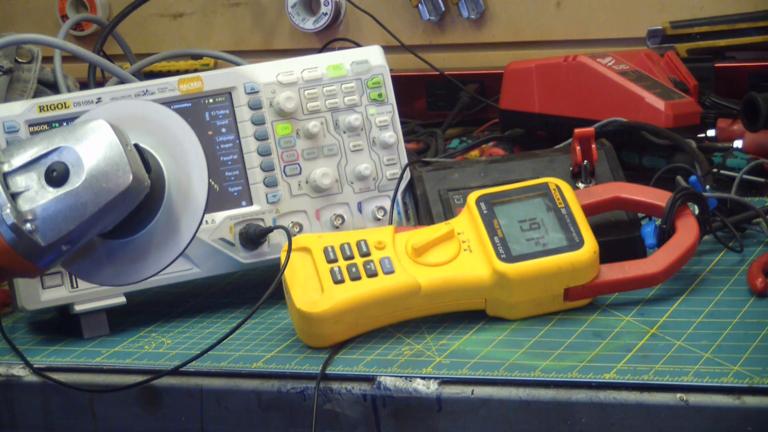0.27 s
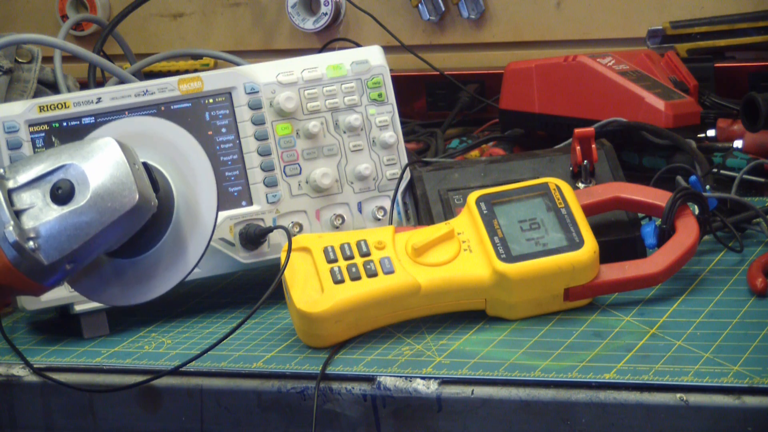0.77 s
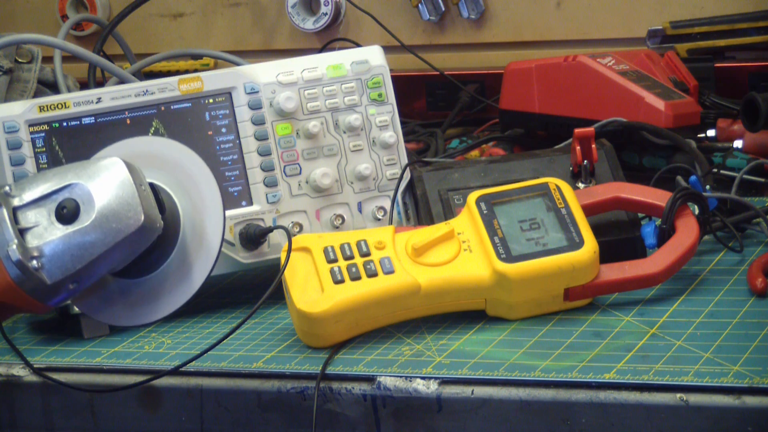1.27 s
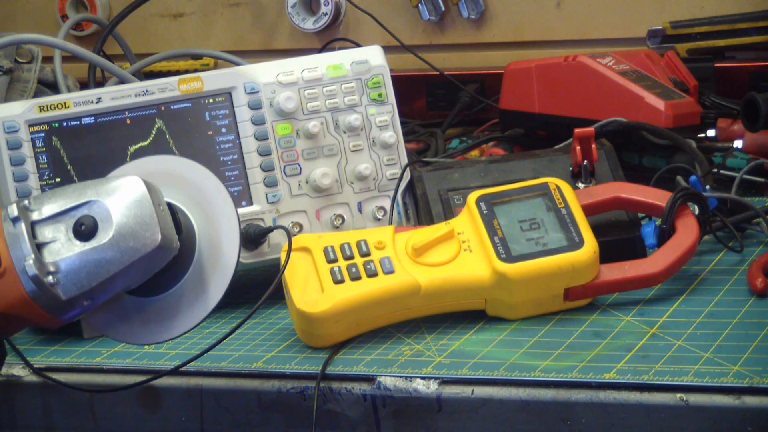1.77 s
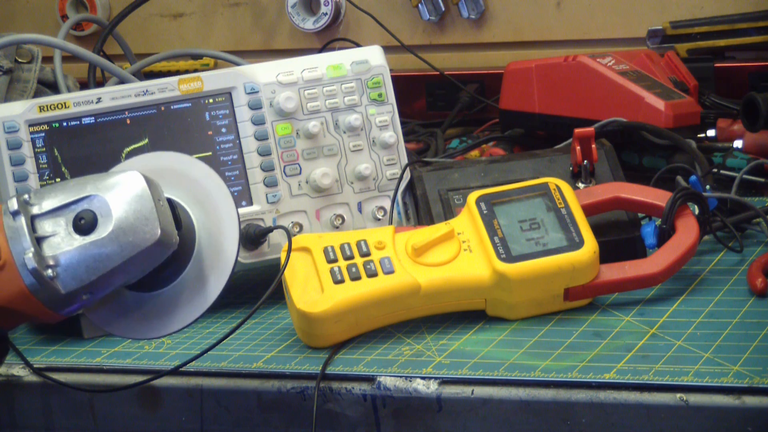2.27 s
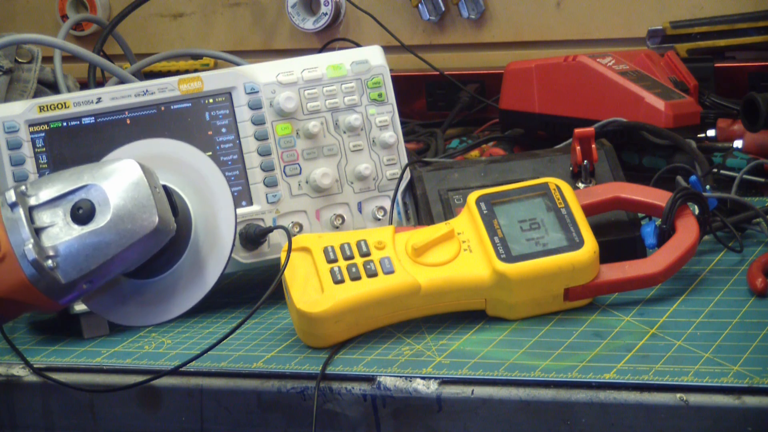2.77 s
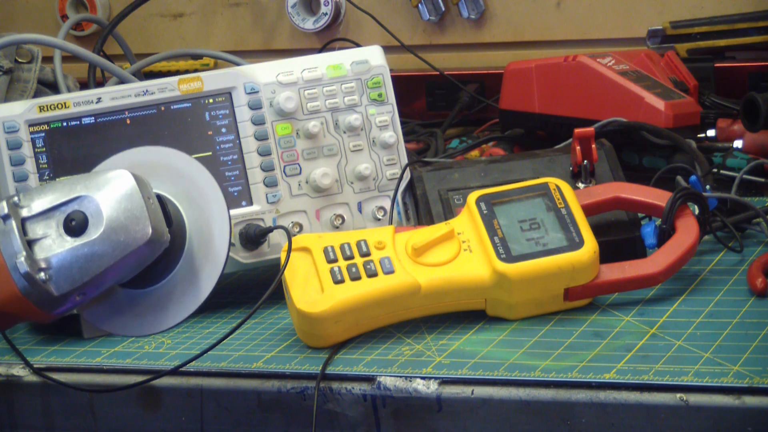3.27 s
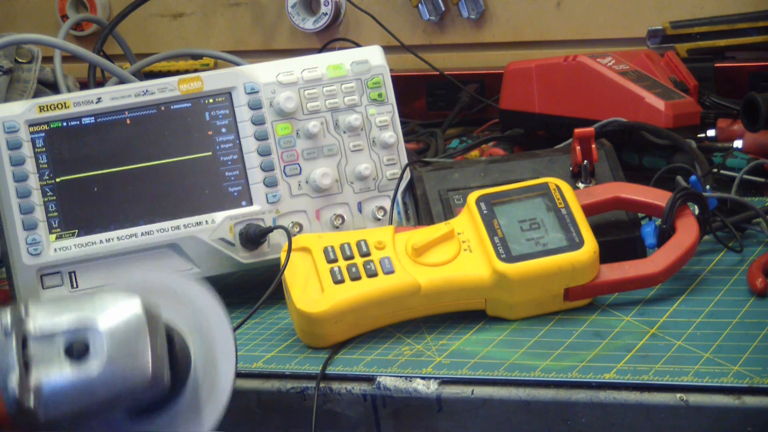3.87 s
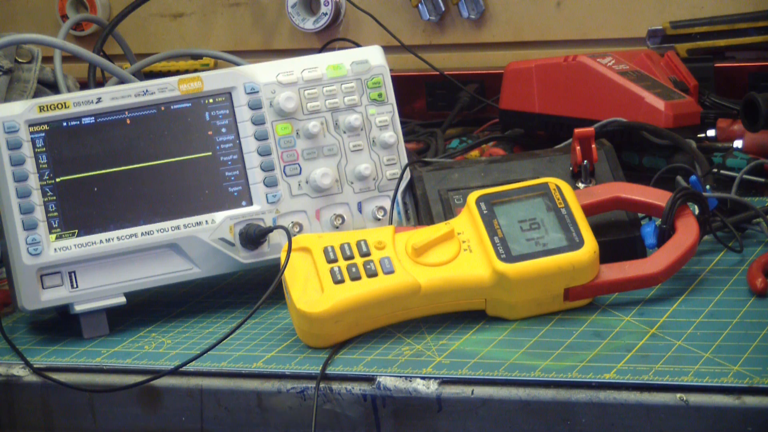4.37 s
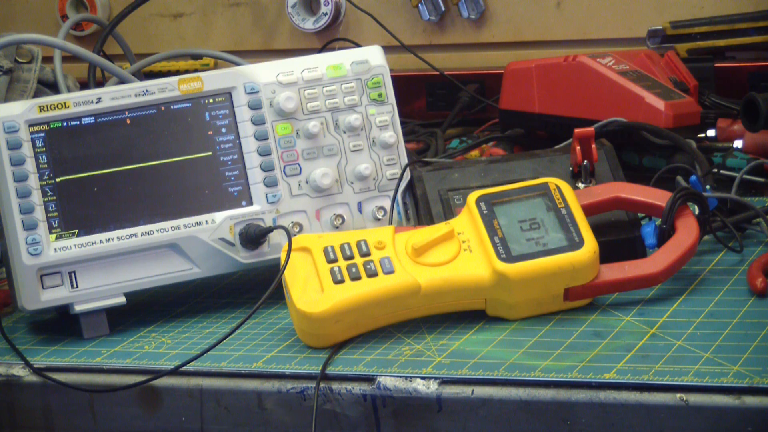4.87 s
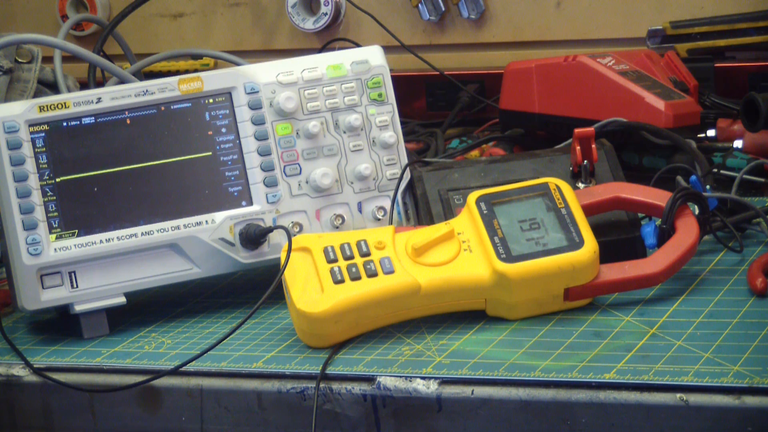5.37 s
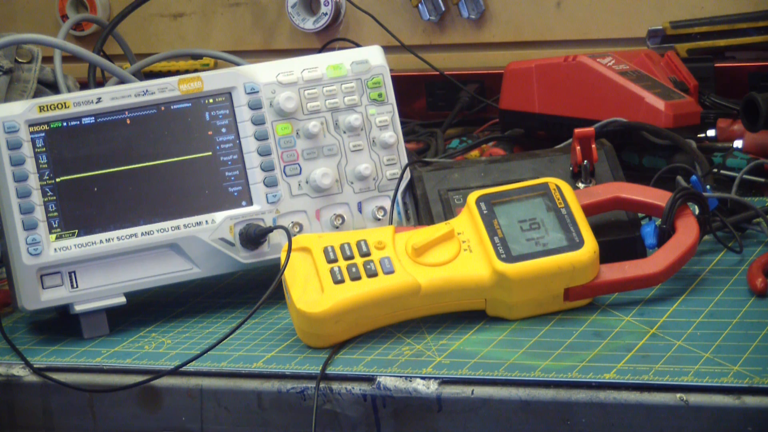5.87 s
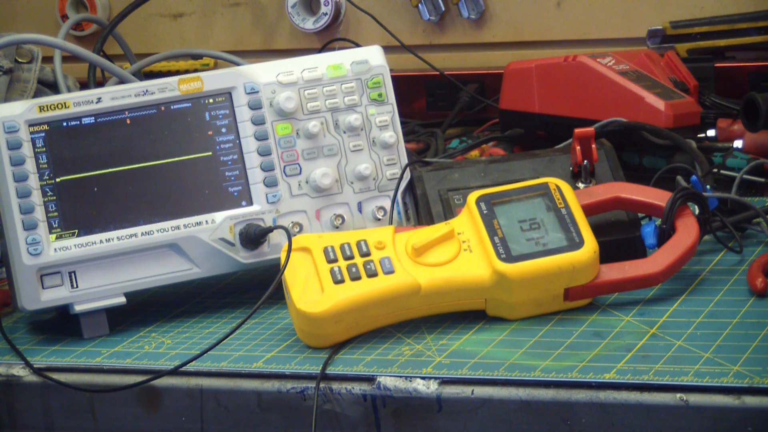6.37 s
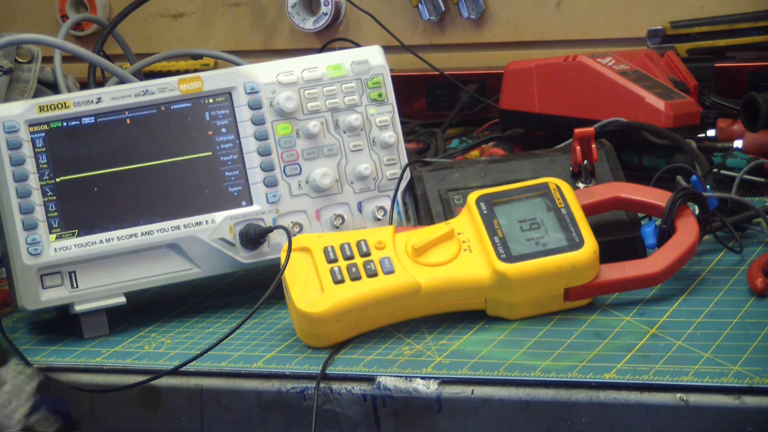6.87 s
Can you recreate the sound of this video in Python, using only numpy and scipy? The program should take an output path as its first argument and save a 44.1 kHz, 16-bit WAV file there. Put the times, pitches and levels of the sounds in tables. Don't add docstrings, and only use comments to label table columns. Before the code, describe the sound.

From 0 to 2.2 seconds an angle grinder runs free, close by: a piercing gear whine near 5.9 kHz, creeping up very slightly, with broad airy fan hiss and fine metallic rattle. At 2.2 it is switched off and the whine begins a smooth continuous slide downward, wavering as it passes through metal case resonances. By 4 seconds it is a rough mid-high growl near 3 kHz; from 4.1 to 5.4 irregular hard gear slaps and clatter grow while the pitch keeps sinking toward about 1 kHz. At 5.26 the disc touches the bench: a loud gritty scrape, bright ringing around 2 kHz and uneven skips. From 5.8 the treble dulls and a low thrum swells until it stalls around 6.1. A faint soft set-down follows to 6.45. Then only quiet low shop rumble and wavering fan hum, gradually lifted since 2.7, remain until 7.1. Short, hard workshop reflections.

```python
import sys
import numpy as np
from scipy import signal
from scipy.io import wavfile
from scipy.ndimage import uniform_filter1d

SR = 44100
rng = np.random.default_rng(int(sys.argv[2]) if len(sys.argv) > 2 else 0)


def field_ratio(decibels):
    return 10 ** (np.asarray(decibels, dtype=float) / 20)


def master(y):
    cut = np.clip(np.atleast_2d(y).T, -1, 1)
    pcm = np.round(cut * 32767)
    wavfile.write(sys.argv[1], SR, pcm.astype(np.int16))


N = 313506
T = np.arange(N) / SR

# spindle order, level in dB settling, at full speed, coasting.
MESH_LINES = [(34, -24, -20, -20), (35, -18, -15, -16), (36, -19, -20, -16), (37, -18, -11, -8),
              (38, -10, -10, -9), (39, -4, -4, -3), (40, -5, -1, -4), (41, 0, 0, 0), (42, -6, -16, -5),
              (43, -15, -10, -3), (44, -24, -16, -7), (45, -32, -28, -10), (46, -32, -32, -16)]
# multiple of the mesh, level in dB, width in steps of 90 Hz.
MESH_OVERTONES = [(2, 0, 5.0), (3, -5, 6.0)]
# time in seconds, level in dB.
WHINE_LEVEL = [(0, -18.5), (.25, -21.5), (.5, -19.5), (.75, -22), (1, -25.5), (1.3, -22), (1.6, -20),
               (1.9, -20.5), (2.2, -20), (2.35, -24), (3.05, -24.5), (3.4, -20.5), (3.9, -23.5), (4.2, -20),
               (4.6, -21), (4.95, -19), (5.25, -27)]
# centre in Hz, width in Hz, level in dB.
GEAR_HEAD_MODES = [(5610, 50, 3), (5815, 50, -3), (5925, 90, 3)]
# centre in Hz, width in Hz, level in dB under the whine.
CASE_VENTS = [(2880, 320, -1), (3500, 300, -8), (4350, 350, -7), (5780, 350, -4), (7900, 800, -9),
              (9000, 800, -6), (11000, 550, -12)]
# centre in Hz, width in Hz, level in dB.
CASE_MODES = [(962, 25, 0.5), (1111.4, 39, 1), (1342, 59, -1.5), (1878, 52, 1.5), (2042, 27, 6.5),
              (2430, 136, 0), (2715, 73, 0.5), (3180, 34, -2), (3450, 17, -10), (3990, 140, -5),
              (4310, 25, 0.5), (5030, 180, -1),
              (5440, 35, -1), (5774, 81, 4.5), (6220, 47, 5.5), (7690, 210, 1.5), (8210, 260, 0.5),
                   (8740, 170, 2.5), (9080, 220, 0.5), (10970, 270, -0.5), (12200, 430, -9)]
# time in seconds, peak in dB, kick to the whine in relative dB.
HARD_SLAPS = [(4.1412, -21, 9), (4.246, -19.5, 2), (4.276, -18, 2), (4.38, -15.5, 4), (4.416, -20, 8),
              (4.451, -19, 10), (4.4897, -17.5, 7), (4.57, -20, 8.5), (4.59, -16.5, -1), (4.621, -19.5, 10),
              (4.665, -17, 9), (4.707, -18.5, 9), (4.749, -20.5, 7), (4.7936, -19.5, 9),
              (4.8199, -19.5, 14), (4.8377, -18, 9), (4.864, -16, 12), (4.904, -16.5, 5.5),
              (4.933, -19, 14), (4.9594, -20, 5), (5.003, -20, 1), (5.0314, -19, 8), (5.0746, -18.5, 0),
              (5.11, -20, 14), (5.136, -18, 13), (5.1603, -19, 3), (5.217, -18, 0), (5.2794, -22, -1),
              (5.338, -15, -3), (5.4386, -16, 1)]
# frequency in Hz, level in dB, t60 in seconds.
CASE_RINGS = [(462, -23, 0.17), (690, -10.5, 0.15), (1900, 2, 0.07), (2058, 2, 0.069), (2900, -4.5, 0.079),
              (3244, -3.5, 0.041), (3560, -0.5, 0.047), (4314, -2, 0.053), (4960, -4, .03),
              (7680, -8, .02), (8160, -15, 0.025)]
# multiple of motor turns, level in dB rms.
MOTOR_LINES = [(1, -50), (2, -47), (3, -51), (4, -47), (5, -49), (6, -51), (7, -52)]
# spindle order, level in dB rms.
DISC_UNBALANCE = [(1, -69), (3, -61), (7, -54), (8, -48)]
# frequency in Hz, level in dB per Hz.
AIR_FAST_SPECTRUM = [(35, -66), (60, -69), (358, -41), (543, -19.5), (596, -28), (685, -10.5), (1060, -0.5),
                     (1250, -9.5), (2390, 0), (4690, -4), (5780, -1.5), (6800, 1), (8980, -8.5),
                     (12700, -26.5), (15300, -40.5)]
# frequency in Hz,
# level in dB per Hz.
AIR_SLOW_SPECTRUM = [(35, -70), (123, -66), (392, -37.5), (824, -5), (1400, -10.5), (2000, -0.5),
                     (2600, -10), (4370, -4.5), (5780, -7.5), (6800, -14), (8370, -21.5), (9620, -31.5),
                     (13000, -44.5), (15300, -67)]
# time in seconds, level in dB.
SCRAPE_LEVEL = [
    (5.26, -14),
    (5.29, -17.5),
    (5.31, -18),
    (5.99, -17.5),
    (6.13, -41),
    (6.17, -42),
    (6.21, -37),
    (6.29, -39.5),
    (6.45, -52),
]
# frequency in Hz, level in dB per Hz.
SCRAPE_SPECTRUM = [(35, -43), (60, -15), (392, -38), (495, -15), (556, -11.5), (701, -9), (1040, -11.5),
                   (2290, -5), (3090, -10), (3550, -7), (4480, -10.5), (7810, -8.5), (15300, -28)]
# centre in Hz, width in Hz, level in dB.
DISC_MODES = [(820, 25, -2), (1212, 68, 4), (1673, 66, -2.5), (1908, 39, 5.5), (2250, 115, 1),
              (2654, 59, 3.5), (3610, 77, 3), (3940, 51, 3), (5380, 115, 4), (5810, 110, 4),
              (7680, 170, -1), (8270, 160, -4), (9280, 120, 1.5), (10600, 130, -2)]
# time in seconds, frequency in Hz.
PINCH_RING = [(5.26, 1970), (5.45, 2250), (5.7, 2290), (5.95, 2520), (6.5, 2500)]
# centre in Hz, width in Hz, level in dB.
BENCH_MODES = [(102, 12, 0), (203, 14, -1), (305, 25, -4)]
# frequency in Hz, level in dB per Hz.
SETTLE_SPECTRUM = [(120, -45), (200, -20), (313, -17), (802, -10.5), (1030, -15), (1420, -13),
                   (3070, -21.5), (8000, -37), (10400, -68), (17600, -120)]
# frequency in Hz, likeness from 0 to 1.
STEREO_LIKENESS = [(60, 0.73), (300, 0.95), (1400, 0.99), (3100, 0.97), (6800, 0.63), (15000, 0.43)]
# time in seconds, left minus right in dB.
STEREO_LEAN = [(0.0, -0.5), (0.81, 0), (1.36, 0), (3.97, 0), (7.1, 1.5)]
# frequency in Hz, t60 in seconds.
WALL_DECAY = [(200, 0.12), (2000, 0.61), (8000, 0.27), (15000, 0.15)]
# frequency in Hz, level in dB per Hz.
SHOP_SPECTRUM = [(12, -41), (20, 2.5), (103, -12), (231, -20.5), (360, -9.5), (449, -15), (502, -6.5),
                 (546, -26), (610, -20.5), (3230, -30), (3810, -28.5), (4510, -32.5), (9810, -40),
                 (11000, -39), (15300, -45)]
# centre in Hz, width in Hz, level in dB.
SHOP_FAN_MODES = [(337.5, 28, -3.5), (720, 40, 0), (3820, 200, 0), (6540, 200, 2), (10900, 500, -5)]

CROWN_TEETH, PINION_TEETH, FAN_BLADES = 41, 11, 31
MOTOR_RATIO = CROWN_TEETH / PINION_TEETH
OFF_S, STOP_S = 2.21, 6.08
FULL_HZ, LAG_HZ, SETTLE_S, CREEP_HZ_PER_S = 144.608, 3.216, .4232, .569
COAST_S, EVEN_HZ, BRAKE_PER_S = 2.2202, 104.638, .21041
SLAP_TURN, SLAP_JITTER_TURNS = .1, .07
LOOSE_HZ, LOOSE_DB = 66, 4.0
BLUR = 0.39
CLATTER_DB, CLATTER_RISE_DB, CLATTER_FROM_S, CLATTER_FULL_S = -23, 16, 4.5, 5.12
AIR_DB, RATTLE_DB, RATTLE_SAG_DB = -34.5, -31, -3
DUCK_DB_PER_DB = 0.13
SWITCH_DIP_DB, SWITCH_DIP_S = -3, .25
GRIT_DB, GRIT_LOSS_DB, THRUM_DB, THRUM_RISE_DB = -11, -18.5, -25, 14.5
HOP = 256
TOUCH_FRAME = 890
HUM_HZ, HUM_DB = 352, -5.5
SHOP_DB, EARLY_DB_PER_S = -72, 1.89
OPEN_S, OPEN_DB_PER_S, OPEN_DB = 2.66, 3.5, 15.5
EDGE_HZ = 15100


def evened(x):
    return x / np.sqrt(np.mean(x ** 2) + 1e-20)


def steady(envelope):
    return envelope / np.sqrt(uniform_filter1d(envelope ** 2, size=9000))


def ramp(s, start_s, length_s):
    return np.clip((s - start_s) / length_s, 0, 1)


def read(points, hz):
    f, value = np.transpose(points)
    return np.interp(np.log(hz + 1), np.log(f + 1), value)


def curve(rows):
    s, value = np.transpose(rows)
    return np.interp(T, s, value)


def humps(peaks, hz, lift_db, smooth=1):
    power = smooth
    for f, width, db in peaks:
        power = power + field_ratio(2 * (lift_db + db)) / (1 + (2 * (hz - f) / width) ** 2) ** 2
    return np.sqrt(power)


def case(hz, lift_db):
    return humps(CASE_MODES, hz, lift_db)


def wander(hz):
    points = int(N / SR * hz) + 3
    return np.interp(T * hz, np.arange(points), rng.standard_normal(points)) * 0.87


def resonate(x, hz, width_hz):
    turn = np.exp(2j * np.pi * np.cumsum(hz * np.ones(N)) / SR)
    r = np.exp(-np.pi * width_hz / SR)
    return 2 * (turn * signal.lfilter([(1 - r) ** 2], [1, -2 * r, r * r], x / turn)).real


def rough_tone(hz, width_hz):
    return evened(resonate(rng.standard_normal(N), hz, width_hz))


def noise(colour, patchy_db, band_hz, first=0):
    frames = N // HOP + 5 - first
    hz = np.fft.rfftfreq(1024, 1 / SR)
    a, b, c, d, patches = rng.standard_normal((frames, 513, 5), dtype=np.float32).T
    patches = uniform_filter1d(patches, size=10, axis=0)
    patches = evened(uniform_filter1d(patches, size=12, axis=1))
    same = np.clip(read(STEREO_LIKENESS, hz), -1, 1)[:, None]
    left = a + 1j * b
    right = same * left + np.sqrt(1 - same ** 2) * (c + 1j * d)
    s = (first + np.arange(frames))[None] * HOP / SR
    gain = colour(hz[:, None], s) * np.ones((513, frames))
    inside = (hz > band_hz[0]) & (hz < band_hz[1])
    gain = gain / np.sqrt((gain[inside] ** 2).sum(axis=0) * 2 / 3)
    z = np.array([left, right]) * gain * field_ratio(patchy_db * patches)
    sound = signal.istft(z, nperseg=1024, noverlap=768)[1]
    return np.pad(sound, ((0, 0), (first * HOP, 0)))[:, :N]


def speed():
    powered = FULL_HZ - LAG_HZ * np.exp(-T / SETTLE_S) + CREEP_HZ_PER_S * T
    angle = np.arctan((FULL_HZ + CREEP_HZ_PER_S * COAST_S) / EVEN_HZ) - BRAKE_PER_S * (T - COAST_S)
    return np.where(T < COAST_S, powered, np.maximum(EVEN_HZ * np.tan(angle), 1))


def slaps(turns, spin, decay_s):
    hard_s, hard_db, kick_db = np.transpose(HARD_SLAPS)
    hard_at = np.round(hard_s * SR).astype(int)
    jitter = SLAP_JITTER_TURNS * np.clip(2 - spin / LOOSE_HZ, 0, 1) * wander(30)
    count = np.floor(turns - SLAP_TURN + jitter)
    at = np.flatnonzero(np.diff(np.maximum.accumulate(count))) + 1
    at = at[~np.isin(count[at], np.round(turns[hard_at] - SLAP_TURN))]
    kick = np.zeros(N)
    kick[at] = field_ratio(2.8 * rng.standard_normal(len(at))) * (60 / np.maximum(spin[at], 30)) ** 0.73
    train = kick * field_ratio(LOOSE_DB * np.clip((LOOSE_HZ - spin) / 10, 0, 1))
    train[hard_at] = field_ratio(hard_db + 28)
    kick[hard_at] = field_ratio(hard_db + kick_db + 16.5)
    t = T[:3000]
    shape = (1 - np.exp(-t / .00025)) * np.exp(-t / decay_s)
    ringing = shape * np.exp(0.65 * t / decay_s)
    return signal.oaconvolve(train, shape)[:N], signal.oaconvolve(kick, ringing)[:N]


def gears(spin, turns, kick):
    blur = BLUR * np.clip((110 - spin) / 40, 0, 1)
    settled, coasting = ramp(T, .75, .4), ramp(T, OFF_S, 0.11)
    grid_hz = np.arange(0, SR / 2, 10)
    case_gain = case(grid_hz, 6.5)
    head_gain = humps(GEAR_HEAD_MODES, grid_hz, 3.4, smooth=.5)
    lines = np.zeros(N)
    for order, early_db, full_db, coast_db in MESH_LINES:
        db = early_db + settled * (full_db - early_db)
        db = db + coasting * (coast_db - db) + (1.1 + 2.7 * coasting) * wander(4)
        slip_turns = rng.random() + .03 * wander(9) + .08 * coasting * wander(25)
        passed = np.interp(order * spin, grid_hz, case_gain) ** coasting
        passed = passed * np.interp(order * spin, grid_hz, head_gain) ** (1 - settled)
        lines += field_ratio(db) * passed * np.cos(2 * np.pi * (order * turns + slip_turns))
    mesh_hz = CROWN_TEETH * spin
    fuzz = rough_tone(mesh_hz * 1.021, 330.0)
    mesh = np.sqrt(1 - blur) * evened(lines) + np.sqrt(blur) * fuzz
    out = mesh * steady(.45 + coasting * kick)
    for multiple, db, width_steps in MESH_OVERTONES:
        hz = np.minimum(multiple * mesh_hz, .4 * SR)
        heard = field_ratio(db) * humps(CASE_VENTS, hz, 0, smooth=.0005)
        out += coasting * heard * rough_tone(hz, width_steps * 90)
    return field_ratio(curve(WHINE_LEVEL)) * out


def clatter(slap):
    t = T[:6000]
    modes = np.zeros(len(t))
    for hz, db, t60_s in CASE_RINGS:
        modes += field_ratio(db - 60 * t / t60_s) * np.cos(2 * np.pi * hz * t) / np.sqrt(t60_s)
    modes = modes * (1 - np.exp(-t / .0002))
    shaken = signal.oaconvolve(rng.standard_normal(N) * steady(.25 + slap), modes)[:N]
    grown = ramp(T, CLATTER_FROM_S, CLATTER_FULL_S - CLATTER_FROM_S)
    return field_ratio(CLATTER_DB - CLATTER_RISE_DB * (1 - grown)) * evened(shaken)


def motor(spin, turns):
    shaft = np.zeros(N)
    for k, db in MOTOR_LINES:
        phase_turns = k * MOTOR_RATIO * turns + 0.12 * wander(14.0)
        shaft += field_ratio(db + 0.92 * wander(10.0)) * np.cos(2 * np.pi * phase_turns)
    wobble_db = 10 * np.exp(-((T - OFF_S - .3) / .35) ** 2)
    for k, db in DISC_UNBALANCE:
        level_db = db + wobble_db * (k > 1) + 2.5 * wander(6)
        shaft += field_ratio(level_db) * np.cos(2 * np.pi * (k * turns + rng.random()))
    blade_hz = FAN_BLADES * MOTOR_RATIO * spin
    blade_db = -42 - blade_hz / 1500 + 3.5 * wander(8) - 9 * (abs(blade_hz - 10200) < 1700)
    blade = field_ratio(blade_db) * np.cos(2 * np.pi * FAN_BLADES * MOTOR_RATIO * turns + 1.1 * wander(60))
    blade = blade * (blade_hz < .33 * SR) * (blade_hz > 7000)
    fade = (spin / spin.max()) ** 2.1
    return np.sqrt(2) * (fade * shaft + blade)


def air_and_rattle(slap):
    def slow(s):
        return ramp(s, OFF_S, 3.44)

    def blend(hz, s):
        return field_ratio(read(AIR_FAST_SPECTRUM, hz) * (0.5 - slow(s)) + read(AIR_SLOW_SPECTRUM, hz) * slow(s))

    def air_colour(hz, s):
        return blend(hz, s) * case(hz, 3 + 5 * slow(s) ** 2) / (1 + (hz / 6500) ** 12)

    def rattle_colour(hz, s):
        return blend(hz, s) * case(hz, 3 + 8 * slow(s) ** 2) / (1 + (6500 / (hz + 1)) ** 12)

    duck_db = -DUCK_DB_PER_DB * (curve(WHINE_LEVEL) + 21.4)
    dip_db = SWITCH_DIP_DB * (T > OFF_S + .05) * np.exp(-((T - OFF_S - .1) / SWITCH_DIP_S) ** 2)
    air = noise(air_colour, 1.5, (450, 1200)) * steady(1.4 + slow(T) * slap)
    rattle = noise(rattle_colour, 1.2, (6600, 14000)) * steady(0.62 + slap)
    rattle_db = RATTLE_DB + RATTLE_SAG_DB * slow(T) + duck_db
    return field_ratio(AIR_DB + duck_db + dip_db) * air + field_ratio(rattle_db) * rattle


def drag(slap):
    scrape_db = curve(SCRAPE_LEVEL)
    grit_db = scrape_db + GRIT_DB + GRIT_LOSS_DB * ramp(T, 5.79, 0.15)
    thrum_db = scrape_db + THRUM_DB + THRUM_RISE_DB * ramp(T, 5.5, 0.49) ** 1.6
    swings = rng.standard_normal((N // HOP + 5 - TOUCH_FRAME, len(DISC_MODES)))
    swings_db = 2.2 * uniform_filter1d(swings, size=24, axis=0).T * np.sqrt(24)
    shifting = [(f, w, db + swing_db) for (f, w, db), swing_db in zip(DISC_MODES, swings_db)]

    def colour(hz):
        return field_ratio(read(SCRAPE_SPECTRUM, hz)) * humps(shifting, hz, 6.4)

    def body_colour(hz, s):
        dulling = 0.64 * ramp(s, 5.8, 0.14)
        rubbed = colour(hz) * (hz + 300) ** -dulling
        rubbed = rubbed / (1 + (hz / 5500) ** 8) / (1 + (380 / (hz + 1)) ** 4)
        return np.where(s < STOP_S, rubbed, field_ratio(read(SETTLE_SPECTRUM, hz)))

    def grit_colour(hz, s):
        return colour(hz) / (1 + (5500 / (hz + 1)) ** 8)

    body = noise(body_colour, 2.2, (500, 5000), TOUCH_FRAME)
    grit = noise(grit_colour, 1.5, (5600, 14000), TOUCH_FRAME)
    ring = rough_tone(curve(PINCH_RING), 400.) * np.clip((STOP_S - T) / 0.19, 0, 1)
    thrum = sum(field_ratio(db) * rough_tone(hz, width_hz) for hz, width_hz, db in BENCH_MODES)
    thrum = evened(thrum) * 0.63 + 0.62 * rough_tone(235.0, 390.0)
    catching = field_ratio(0.63 * wander(70.0))
    bounce = steady(0.75 + slap + 3.1 * ramp(T, 5.42, 0.21))
    scrape = field_ratio(scrape_db) * (0.69 * body + 0.44 * ring) * bounce ** 0.3
    scrape = (scrape + field_ratio(grit_db) * grit * bounce) * catching
    touch = ramp(T, SCRAPE_LEVEL[0][0], .02) * np.clip((SCRAPE_LEVEL[-1][0] - T) / .1, 0, 1)
    return touch * (scrape + field_ratio(thrum_db) * thrum)


def walls(x):
    taps = np.zeros((2, SR // 2))
    starts = np.arange(150, SR // 2 - 20, 20)
    at = starts + rng.integers(0, 20, (2, len(starts)))
    np.put_along_axis(taps, at, rng.choice([-1., 1.], at.shape), 1)
    hz, t, z = signal.stft(taps, SR, nperseg=256)
    decay = field_ratio(-60 * t / read(WALL_DECAY, hz)[:, None])
    tail = signal.istft(z * decay, SR, nperseg=256)[1]
    tail = 0.61 * tail + 0.82 * tail[0]
    return signal.fftconvolve(x[None], tail / np.linalg.norm(tail[0]), axes=1)[:, :N]


def shop():
    def colour(hz, s):
        return field_ratio(read(SHOP_SPECTRUM, hz)) * humps(SHOP_FAN_MODES, hz, 6)

    rumble = noise(colour, 1.8, (20, 90))
    hum = field_ratio(HUM_DB + 2.2 * wander(7)) * rough_tone(HUM_HZ + 14 * wander(4), 31.0)
    opened_db = np.clip(OPEN_DB_PER_S * (T - OPEN_S), 0, OPEN_DB)
    return field_ratio(SHOP_DB + EARLY_DB_PER_S * np.minimum(T, 6.4) + opened_db) * (rumble + hum)


def scene():
    spin = speed()
    turns = np.cumsum(spin) / SR
    slap, kick = slaps(turns, spin, 0.0039)
    turning = np.clip((5.46 - T) / .2, 0, 1)
    tones = (gears(spin, turns, kick) + clatter(slap) + motor(spin, turns)) * turning
    echo = field_ratio(-7) * walls(tones)
    near = 0.88 * tones + echo + air_and_rattle(slap) * turning + drag(slap)
    lean_db = curve(STEREO_LEAN)
    return near * field_ratio(np.array([lean_db, -lean_db]) / 2) + shop()


def band_limit(x):
    return signal.sosfilt(signal.butter(12, 15710, fs=SR, output="sos"), x)


def record(dry):
    limited = .9 * np.tanh(dry / .9)
    edge = signal.firwin(255, EDGE_HZ, window=("kaiser", 6), fs=SR)
    return band_limit(signal.oaconvolve(limited, edge[None], "same"))


dry = scene()
out = record(dry)
master(out)
```